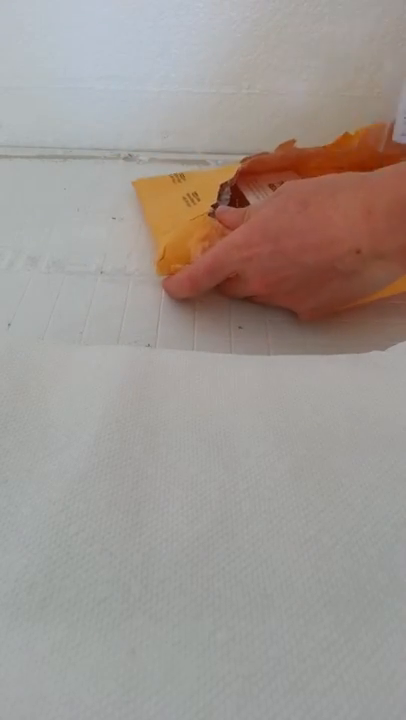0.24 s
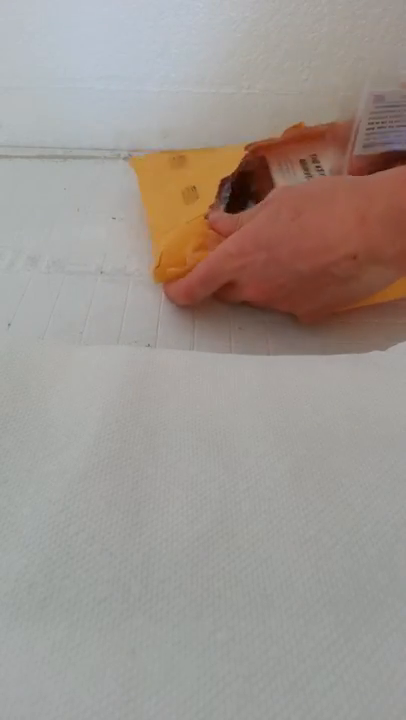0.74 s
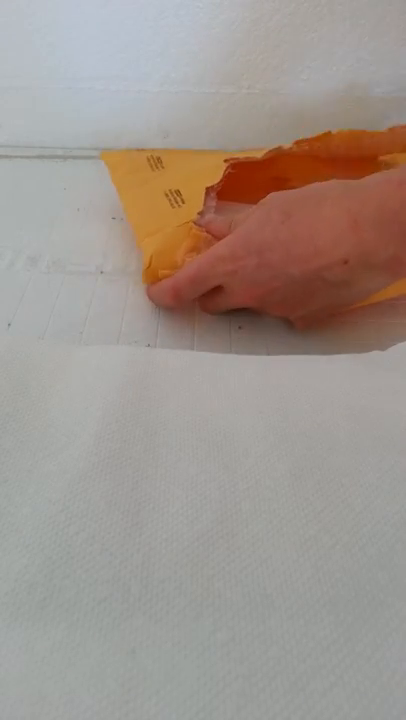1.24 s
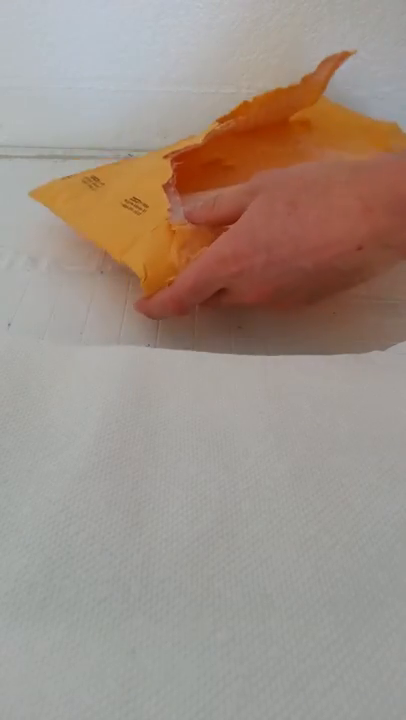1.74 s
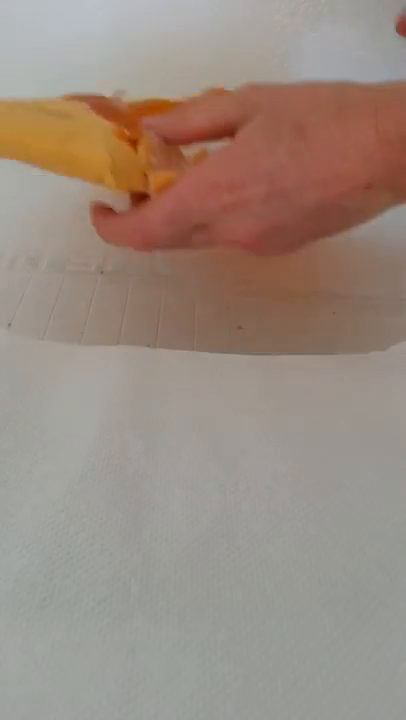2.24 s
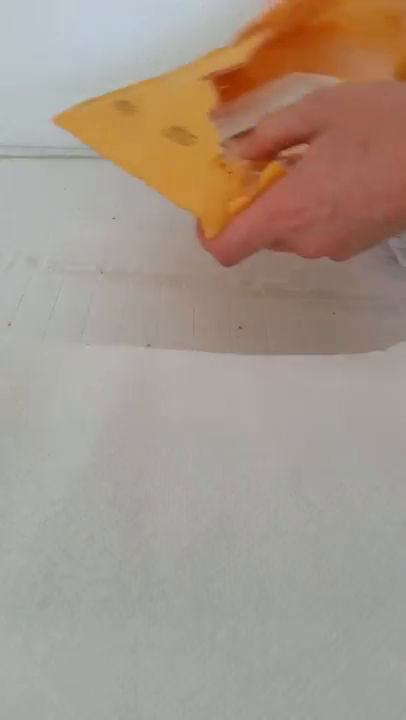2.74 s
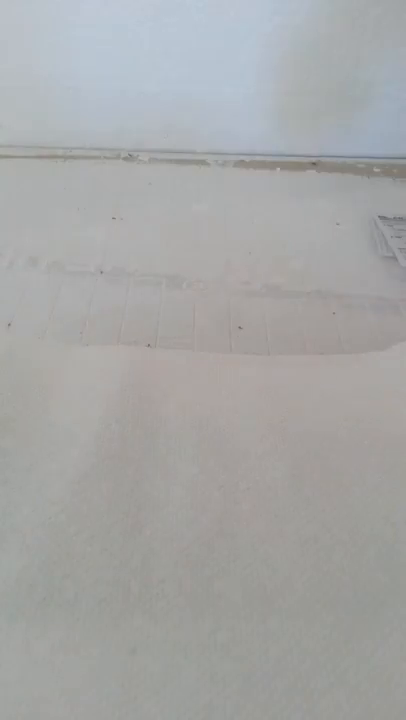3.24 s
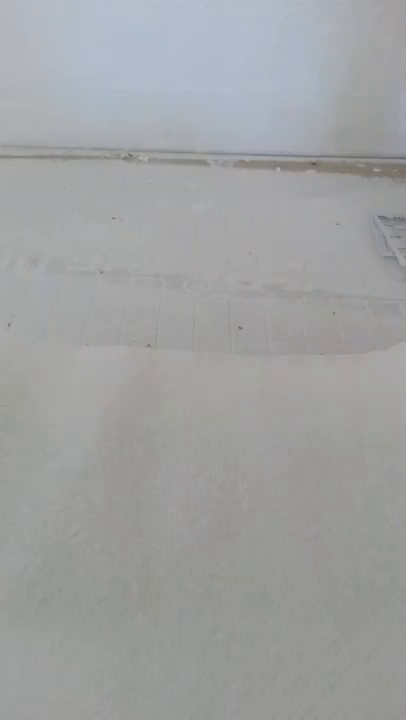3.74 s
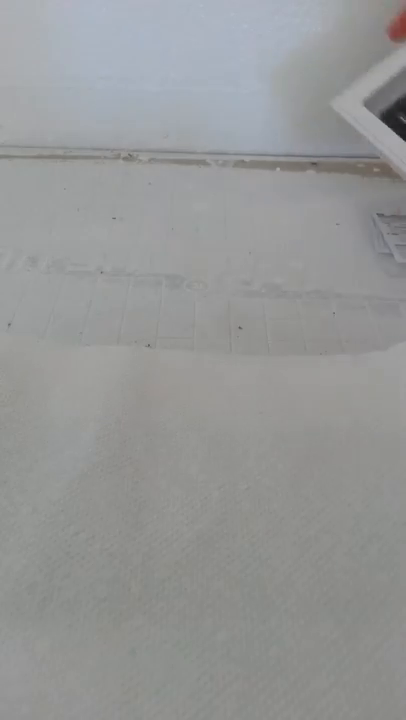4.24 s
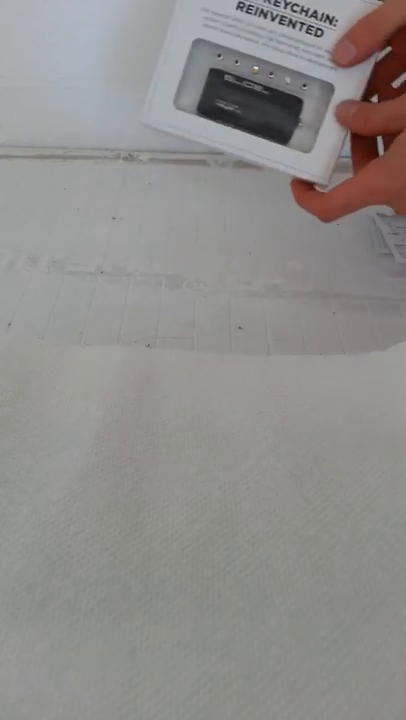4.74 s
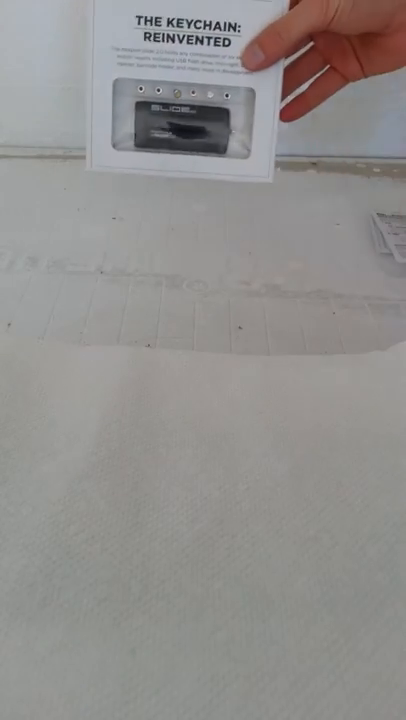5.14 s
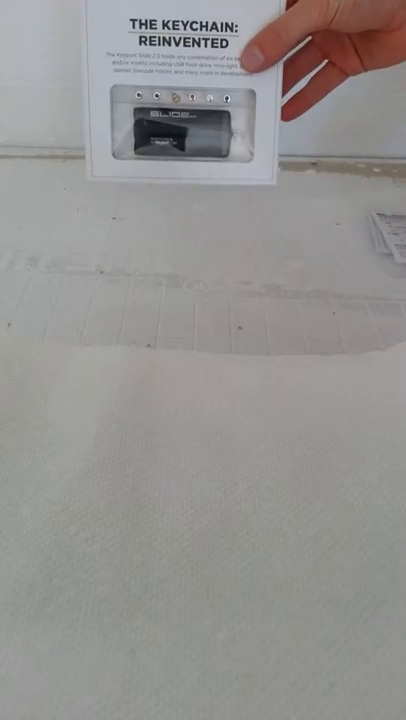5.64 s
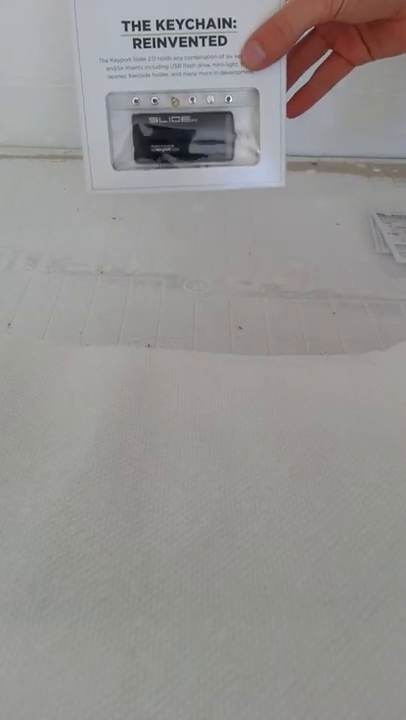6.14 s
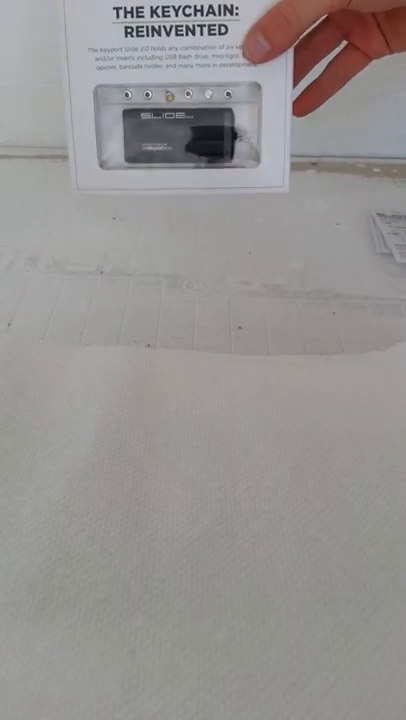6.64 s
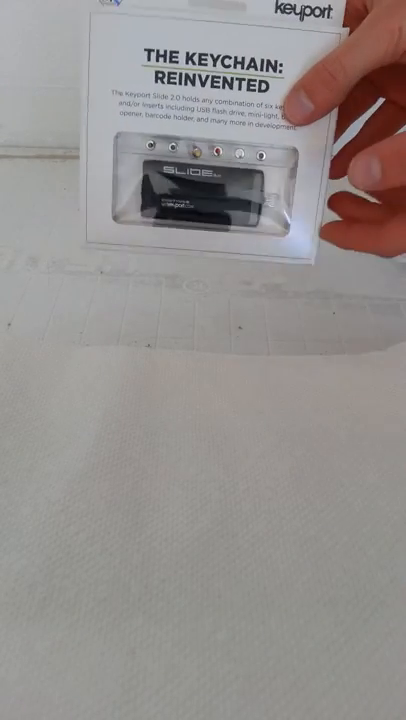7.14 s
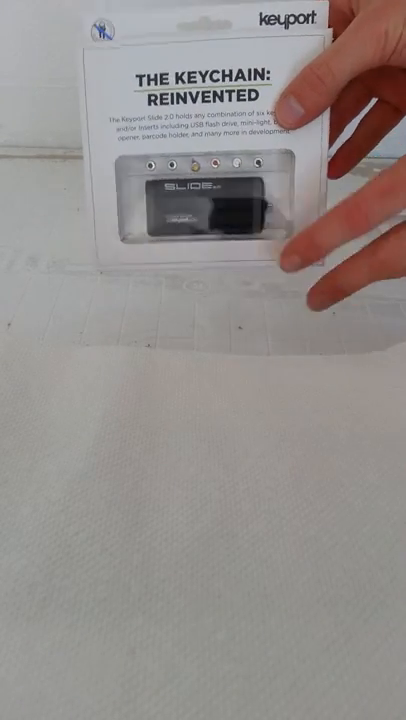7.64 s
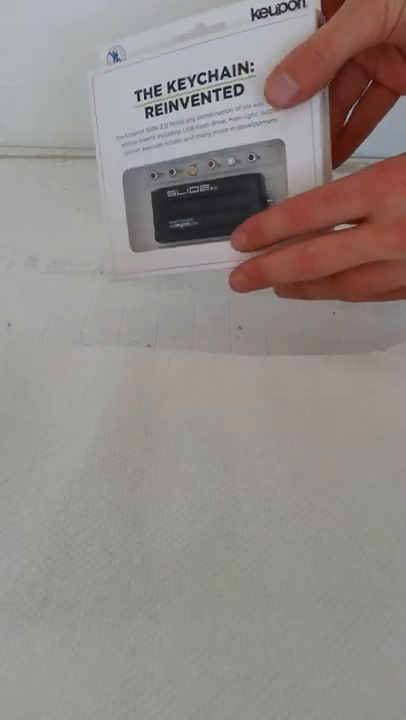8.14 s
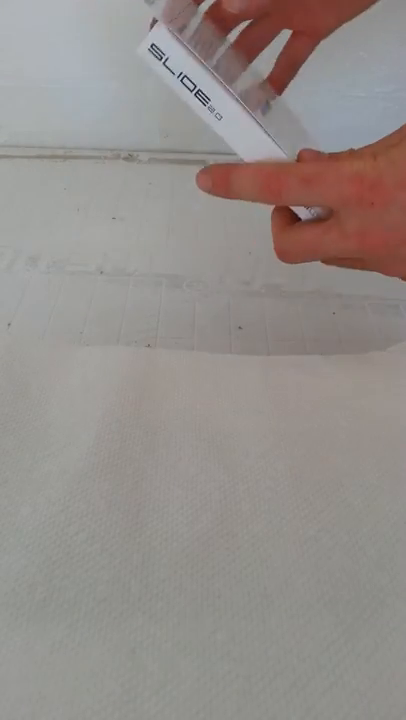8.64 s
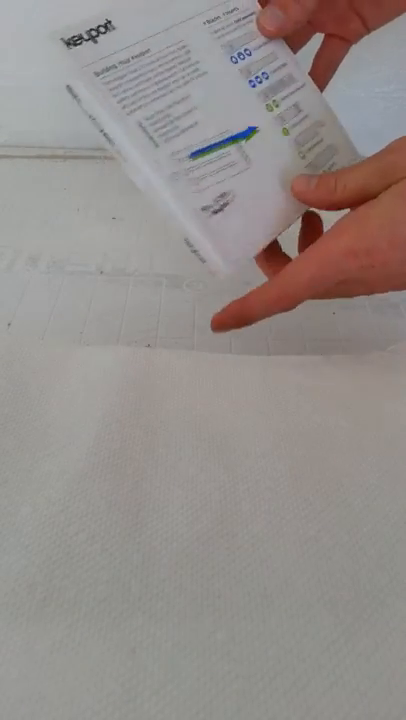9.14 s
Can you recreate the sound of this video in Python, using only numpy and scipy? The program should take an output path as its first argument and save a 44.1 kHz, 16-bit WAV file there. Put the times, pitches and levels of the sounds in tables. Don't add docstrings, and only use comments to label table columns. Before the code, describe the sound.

Hands empty a torn padded paper envelope close to the microphone in a bare, echoing room. Dense crisp rustling, crease snaps and dull knocks build to the loudest crumple around two and a half seconds. The envelope is tossed and thuds on the floor, the rustle dies away, and only a soft hush remains with faint finger slides and small taps on a thin card box.

```python
import sys
import numpy as np
from scipy import signal
from scipy.fft import rfft, irfft, next_fast_len
from scipy.io import wavfile
from scipy.ndimage import uniform_filter1d, map_coordinates

SR = 44100
rng = np.random.default_rng(int(sys.argv[2]) if len(sys.argv) > 2 else 0)


def output_pcm(signal):
    pcm = np.clip(np.atleast_2d(signal).T, -1, 1) * 32767
    wavfile.write(sys.argv[1], SR, np.round(pcm).astype(np.int16))


def rack_gain(trim_db):
    fader = np.asarray(trim_db, float)
    return 10 ** (fader / 20)


N = 414091
SIZE = next_fast_len(N + SR)
SHORT = 2 ** 15
BURST = 8000

# frequency in Hz, level in dB per Hz.
CRISP = [(1760, -43.5), (2600, -17.5), (3300, -11.5), (4200, -6), (4990, -3), (6210, -1.5), (6840, 0),
         (9070, -10.5), (14000, -18), (14550, -17.5), (15200, -46.5)]
# frequency in Hz, level in dB per Hz.
MIDDLE = [(590, -30.5), (1000, -3), (1520, -1.5), (1810, 0), (3300, -5), (4000, -9.5), (5200, -22),
          (8800, -120)]
# frequency in Hz, level in dB per Hz.
BODY = [(29, -43.5), (50, -29), (115, -11.5), (253, -2.5), (361, -3), (531, -2.5), (586, -6), (686, -0.5),
        (938, -6.5), (1500, -19.5), (1950, -46), (3300, -120)]
# time in seconds, level of the top register in dB.
FACING = [(0, -1.5), (.8, 3.5), (1.3, 0.5), (1.8, -3.5), (2.52, 0.5), (2.62, -8), (2.73, -13.5), (2.8, 0.5),
          (2.97, 5), (3.02, 1), (3.2, 1), (3.28, -3), (3.55, 3), (3.72, -1.5), (3.8, -6), (3.95, -1.5),
          (4.6, 1), (9.39, -1.5)]


def paper():
    crisp, middle, body = rustle()
    crisp_snaps, middle_snaps = snaps()
    crisp = crisp + crisp_snaps
    beam_hz = 11000
    top = signal.sosfilt(signal.butter(4, beam_hz, "high", fs=SR, output="sos"), crisp)
    rest = signal.sosfilt(signal.butter(4, beam_hz, "low", fs=SR, output="sos"), crisp)
    bright = colour(rest + top * rack_gain(in_time(FACING)[0]), CRISP)
    return bright + colour(middle + middle_snaps, MIDDLE) + colour(body, BODY)


# time in seconds, room sound in dB against direct sound, grains per second.
DISTANCE = [(0, -7.5, 3060), (3.2, -9, 2300), (3.45, -5.5, 2300), (4.2, -5, 2830), (4.6, -10.5, 3000),
            (5.2, -11, 3900), (9.39, -23.5, 4430)]


def rustle():
    shake = grains(in_time(DISTANCE)[1], spread_db=4.0, clump_db=3.0) + 0.8 * rng.standard_normal(N)
    shake = shake * rack_gain(-3)
    turned = np.abs(shake) * np.sign(shake[::-1])
    crisp = shake * effort(shift_db=0, follows=0, lingers=0.8)
    middle = turned * effort(shift_db=-4, follows=0.57, lingers=0.92)
    body = shake * effort(shift_db=0, follows=0.92, lingers=0.94)
    return crisp, middle, body


# peak time in seconds, crisp rustle in dB,
# rise in seconds, fade in seconds, weight (body in dB against crisp).
GRIPS = [(0.0, -34.5, .5, 2.2, -9), (.34, -34.5, 0.036, 2.5, -12.5), (.53, -35.5, 0.55, 0.96, -15.5),
         (.86, -26, 0.33, 1.2, -12), (1.12, -30, 0.24, 0.41, -11), (1.56, -26, 0.0055, 0.63, 0.5),
         (2.037, -38, 0.0066, 0.64, -17.5), (2.2, -35, 0.007, 0.59, -18.5), (2.34, -46, .08, 0.88, -18.5),
         (2.58, -17.5, 0.068, 0.4, -15), (2.8, -27.5, 0.033, 1.1, -13.5), (2.9, -20.5, 0.19, 0.55, -9.5),
         (3.09, -23.5, 0.34, 0.4, -8.5), (3.49, -27.5, .005, 0.57, -8), (3.704, -25, .03, 0.51, -0.5),
         (3.94, -40.5, 0.034, 0.89, 4), (4.357, -35.5, 0.067, 0.043, -8), (4.39, -54.5, .1, 0.62, -8.5),
         (4.561, -41, 0.054, 0.3, 5.5), (4.8, -47.5, 0.048, 0.23, 4.5), (4.91, -59, 0.043, 0.15, 21)]
# peak time in seconds, crisp rustle in dB,
# rise in seconds, fade in seconds, weight (body in dB against crisp).
TURNS = [(5.4, -73.5, .6, .8, 2.5), (6.03, -53.5, 0.15, 0.29, -6.5), (6.31, -63, 0.18, 0.77, -0.5),
         (6.561, -68.5, .3, 0.16, 0.5), (6.88, -54.5, 0.16, 0.13, -20.5), (7.05, -75, 0.051, 0.19, 0),
         (7.11, -37.5, 0.018, 0.087, -13.5), (7.16, -62, 0.056, 0.22, 0), (7.27, -66, 0.047, 0.099, -7),
         (7.678, -58.5, 0.095, 0.71, -18), (7.762, -52, 0.093, 0.28, -4), (8.236, -49.5, 0.015, 0.27, -1.5),
         (8.465, -54.5, .016, 0.13, -4), (8.724, -40.5, .01, 0.23, -8), (8.998, -46, 0.016, 0.087, -11.5),
         (9.2, -74, 0.55, 1.1, 1)]


def effort(shift_db, follows, lingers):
    t, power = np.arange(0, N + 64, 64) / SR, 1e-14
    for s, db, rise, fade, weight_db in GRIPS + TURNS:
        level_db = db + shift_db + follows * weight_db + swell_db(t, s, rise, fade * lingers)
        power = power + rack_gain(level_db) ** 2
    return np.interp(np.arange(N) / SR, t, np.sqrt(power))


# time in seconds, peak in dB, middle in dB against the peak.
TICKS = [(.1149, -4.5, -17), (.216, -15.5, -32), (.402, -12.5, -20.5), (.6258, -16, -23),
         (.6894, -20.5, -27.5), (.8153, -14.5, -28), (1.046, -14.5, -16.5), (1.3193, -14, -24.5),
         (1.3472, -22, -27), (1.9129, -26.5, -5.5), (2.0596, -14.5, -16.5), (2.284, -26, -24),
         (2.3262, -14.5, -38.5), (2.3454, -23.5, -20.5), (2.4186, -30, -30), (2.557, 0, -16.5),
         (2.9481, -2, -27), (3.0003, -3.5, -14.5), (3.0879, -6, -15), (3.1443, -16, -24.5),
         (3.6784, -3.5, -1.5), (4.105, -19, -8), (4.2572, -24.5, -30), (4.358, -11, -14.5),
         (4.7196, -23, -21), (4.7693, -34.5, -6.5), (4.796, -26, -14), (5.115, -30.5, -18)]
# time in seconds, peak in dB, middle in dB against the peak.
SNAPS = [(0.7098, -15.5, -18), (1.121, -17, -33), (1.152, -12, -44), (1.2282, -12.5, -18.5),
         (1.45, -36, -7.5), (1.556, -7, -6), (1.6, -7.5, -10), (1.843, -22.5, -23.5), (1.943, -25.5, -11.5),
         (2.034, -17.5, -15.5), (2.196, -21.5, -41), (2.432, -23, -27.5), (2.818, -13, -13.5),
         (2.8781, -9, -9.5), (2.971, -11, -10), (3.0636, -10, -14), (3.1125, -7, -26.5), (3.4848, -11, -17),
         (3.6592, -10.5, -11), (3.936, -15, -12.5), (4.0742, -20.5, -8), (4.1994, -20.5, -11.5),
         (4.5338, -25, -13), (4.564, -23, -7.5), (4.8142, -24.5, -17.5), (4.905, -29, -10.5)]
# time in seconds, peak in dB, middle in dB against the peak.
FLICKS = [(5.4471, -45, -19), (6.3159, -37, -21), (7.1097, -36, -11), (7.767, -32, -7.5),
          (8.234, -29, -7.5), (8.2935, -27.5, -13), (8.4662, -28.5, -14), (8.717, -29.5, -19),
          (8.734, -30.5, -31.5), (8.781, -30, -2.5), (8.8128, -26.5, -18), (8.9085, -38.5, -20),
          (8.993, -34.5, -23), (9.203, -40.5, -18.5)]
# time in seconds, peak in dB, sometimes middle in dB against it.
SLIDES = [(.5197, -19.5), (5.9612, -49.5), (6.0227, -51, -21), (6.089, -54, -17), (6.5594, -54.5),
          (6.8326, -56, -18.5), (6.92, -56.5), (7.1777, -48), (7.2564, -56), (7.642, -49.5),
          (7.9914, -50.5, -15), (9.1488, -57.5)]
# time in seconds, peak in dB.
LEAD_INS = [(2.54, -18.5), (4.343, -35), (5.104, -54.5), (6.297, -55), (7.088, -55), (8.218, -54),
            (8.457, -45.5), (8.983, -54)]
# time in seconds, peak in dB.
CRACKS = [(2.5603, 1), (2.566, -11), (2.787, -13.5), (2.9134, -9.5), (3.4899, -18)]
# share of sudden crack from 0 to 1, seconds to die by 60 dB,
# left against right in dB, usual middle in dB against the peak.
KINDS = [
    (0.82, 0.018, -2, -20),
    (0.67, 0.084, -3.5, -15),
    (0.79, 0.078, -1.5, -15),
    (0.19, 0.13, -1.5, -24.5),
    (.08, 0.047, -1, -14),
    (0.67, 0.017, -0.5, -18.5),
]
# time in seconds, peak in dB.
POPS = [(.2678, -21.5), (.6262, -6.5), (.7114, -14), (.7186, -17), (.7797, -16.5), (.8168, -11),
        (.8528, -9.5), (.916, -11.5), (1.2377, -14.5), (1.3257, -24.5), (1.601, -7.5), (1.9969, -28.5),
        (2.039, -22.5), (2.2014, -17.5), (2.2091, -22.5), (2.3225, -20.5), (2.3517, -21), (2.4395, -23),
        (2.8006, -13), (2.892, -5), (3.023, -9), (3.036, -9), (3.2019, -17), (3.9367, -13), (4.0737, -16),
        (4.546, -21), (4.5649, -11), (4.8162, -24)]


def snaps():
    crisp, middle = np.zeros((2, 2, N + BURST))
    t = np.arange(BURST) / SR
    tables = [TICKS, SNAPS, FLICKS, SLIDES, LEAD_INS, CRACKS]
    for table, (crack, t60, pan_db, usual_db) in zip(tables, KINDS):
        flurry = (1 - np.exp(-t / (0.07 * t60))) * rack_gain(-60 * t / t60)
        shape = (1 - crack) * flurry / flurry.max() + 1.3 * crack * rack_gain(-60 * t / 0.0057)
        step = 2.0 * crack * (t == 0)
        pan = rack_gain([[1.5 * pan_db], [-0.4 * (pan_db + 1.5)]])
        for row in table:
            s, db, middle_db = (*row, usual_db)[:3]
            noise = rng.standard_normal(BURST)
            force = shape * np.array([noise, noise[::-1]]) + step
            burst = rack_gain(db - 6.5) * force[:, None] * pan
            i = round(s * SR)
            crisp[:, i:i + BURST] += burst[0]
            middle[:, i:i + BURST] += burst[1] * rack_gain(middle_db + 10.0)
    for s, db in POPS:
        crisp[:, round(s * SR)] += rack_gain(db + np.array([-3.0, 3.0]))
        middle[:, round(s * SR)] += rack_gain(db - 13.5)
    return crisp[:, :N], middle[:, :N]


# time in seconds, peak in dB, pitch in Hz.
THUMPS = [(0.115, -31, 656), (.396, -36.5, 542.4), (.648, -31.5, 670), (.678, -29.5, 660),
          (.732, -20.5, 553), (.779, -29, 1440), (1.048, -28, 738), (1.146, -26, 460), (1.23, -25.5, 670),
          (1.455, -31.5, 950), (1.558, -11, 677), (1.5995, -16.5, 791), (1.65, -21, 744),
          (2.555, -27.5, 240), (2.853, -29, 258), (2.911, -20, 600), (3.041, -29, 328), (3.069, -20.5, 403),
          (3.491, -28, 413), (3.544, -26.5, 350), (3.662, -14, 579.3), (3.678, -3, 463.6),
          (4.357, -45, 760), (4.536, -36, 783), (4.566, -32, 740), (4.795, -31, 734), (4.914, -33, 774)]
# time in seconds, peak in dB, pitch in Hz.
TAPS = [(5.685, -58, 398), (5.789, -55.5, 413.6), (6.406, -54, 383), (7.1, -46.5, 288), (7.766, -28, 1235),
        (7.994, -49, 349), (8.234, -33, 1236), (8.315, -35.5, 1260), (8.739, -42, 307), (8.781, -29, 640),
        (5.117, -50, 503), (7.74, -54, 487), (7.946, -58.5, 1052), (7.996, -50, 1175), (8.219, -47, 370),
        (8.316, -41, 686), (8.756, -41, 1250), (8.994, -62, 291), (7.016, -63, 1304), (7.04, -58, 1098),
        (7.063, -61, 1400), (6.0, -49, 500), (3.6954, -23, 475), (3.702, -15, 397), (1.605, -18, 660),
        (1.612, -16, 744)]


def thumps():
    out, t = np.zeros(N + BURST), np.arange(BURST) / SR
    for table, t60 in [(THUMPS, 0.016), (TAPS, 0.009)]:
        for s, db, hz in table:
            ratios = [0.5, 1, 1.5] * rack_gain(0.39 * rng.standard_normal(3))
            modes = rack_gain([-12, 0, -10]) @ np.sin(2 * np.pi * hz * np.outer(ratios, t))
            swell = (1 - np.exp(-t * hz * 4)) * rack_gain(-60 * t / t60)
            i = round(s * SR)
            out[i:i + BURST] -= rack_gain(db + 4.5) * modes * swell / swell.max()
    return signal.sosfilt(signal.butter(3, 150, "high", fs=SR, output="sos"), out[:N])


# peak time in seconds,
# level in dB, rise in seconds, fade in seconds, pitch in Hz.
POCKETS = [(0.748, -42.5, 0.033, .5, 526), (1.458, -53, .006, 0.034, 950), (1.564, -26, .008, 0.24, 880),
           (2.09, -44, 0.092, 0.41, 1850), (2.382, -46, .03, 0.033, 2920), (2.445, -51, 0.044, 0.082, 3050),
           (3.74, -26, 0.042, 0.18, 1900), (8.24, -49, .008, 0.048, 1500), (1.0, -50, .1, 0.089, 66),
           (1.248, -55, .2, 0.11, 63.8), (4.58, -53, .05, 0.12, 68), (7.79, -61, 0.046, 0.08, 65),
           (8.25, -63, 0.036, .15, 68.3), (8.761, -68, 0.041, 0.18, 68), (2.58, -27, 0.017, 0.33, 3480),
           (2.881, -24.5, .01, .06, 2800), (2.916, -27, .005, .04, 1500), (2.557, -33.5, 0.054, 0.12, 577),
           (3.715, -19, 0.051, 0.6, 420), (3.702, -22.5, 0.02, 0.28, 245), (4.38, -44, 0.11, 0.11, 258),
           (5.46, -70.5, .8, 0.82, 400), (5.9, -67.5, 0.61, .5, 390), (6.4, -71, 0.45, 0.56, 401),
           (7.38, -75, .6, .5, 399.7), (7.769, -48, .03, 0.07, 948), (8.32, -52, .04, 0.07, 504),
           (8.745, -48.5, .02, 0.23, 334), (8.76, -43, 0.03, 0.15, 1010), (9.37, -76, 0.45, .4, 400)]


def pockets():
    out, t = np.zeros(N), np.arange(N) / SR
    sharpness = 1.7
    flutter = 0.74 * grains(400, spread_db=2.5, clump_db=2.0) + 0.7 * rng.standard_normal(N)
    for s, db, rise, fade, hz in POCKETS:
        near = slice(max(0, int((s - 2 * rise) * SR)), int((s + 2 * fade) * SR))
        b, a = signal.iirpeak(hz, sharpness * (hz / 450) ** 0.4, fs=SR)
        force = flutter[near] * rack_gain(db + swell_db(t[near], s, rise, fade))
        force = force * np.sqrt(sharpness * SR / hz)
        out[near] += signal.lfilter(b, a, signal.lfilter(b, a, force))
    return out


def swell_db(t, s, rise, fade):
    return -30 * np.maximum((s - t) / rise, (t - s) / fade)


def grains(per_s, spread_db, clump_db):
    slow = uniform_filter1d(rng.standard_normal(N), size=256) * 16
    born = rng.random(N) < per_s * rack_gain(clump_db * slow) / SR
    sizes = rack_gain(spread_db * np.minimum(rng.exponential(1, N), 4))
    x = born * sizes * rng.choice([-1, 1], N)
    return x / np.sqrt(np.mean(x ** 2))


def tabletop(x):
    hop, left_lag_s = 1024, 0.00027
    sway = uniform_filter1d(uniform_filter1d(rng.standard_normal(N), size=6000), size=6000) * 95
    late = map_coordinates(x[0], [np.arange(N) - SR * left_lag_s * (1 + 0.35 * sway)], order=3)
    out = np.stack([0.42 * late, x[1]])
    starts, t = np.arange(0, N - 4 * hop, hop), np.arange(hop) / SR
    window = np.sin(np.pi * np.arange(2 * hop) / (2 * hop))
    pieces = x[:, starts[:, None] + np.arange(2 * hop)] * window
    paths = rng.standard_normal((2, len(starts), hop)) * rack_gain(-60 * t / 0.025)
    paths *= rack_gain([[[-19]], [[-28]]])
    paths -= uniform_filter1d(paths, size=40)
    scattered = irfft(rfft(pieces, 4 * hop) * rfft(paths, 4 * hop), 4 * hop)
    for k, i in enumerate(starts):
        out[:, i:i + 4 * hop] += scattered[:, k]
    return out


def room(x):
    turn = 2 * np.pi * 1.3 * np.arange(N) / SR
    return through(x * np.cos(turn), walls()) + through(x * np.sin(turn), walls())


# frequency in Hz, seconds to die by 60 dB.
ROOM_T60 = [(150, 0.11), (500, 0.48), (1800, 0.95), (6000, 0.59), (14000, 0.24)]


def walls():
    t, noise, tail = np.arange(SR) / SR, diffuse_noise(SR), 0
    for k, (_, t60) in enumerate(ROOM_T60):
        share = at_hz([(hz, j == k) for j, (hz, _) in enumerate(ROOM_T60)], SR)
        tail = tail + irfft(noise * share, SR) * rack_gain(-60 * t / t60)
    tail = tail * np.clip((t - 0.012) / 0.0016, 0, 1)
    return tail / np.sqrt(np.sum(tail ** 2) / 2)


# frequency in Hz, left against right in dB.
PORTS = [(60, -4), (99, -5.5), (160, 6.5), (270, 7.5), (450, 5), (1220, 1), (3330, 3), (5500, 2.5),
         (9080, -4.5), (11600, -3.5), (13000, -13.5), (14300, -26.5)]
# ringing frequency in Hz, width in Hz, height in dB.
PORT_RING = (6850, 1900, 6.2)


def ports(x):
    hz, width, db = PORT_RING
    ring_db = db / (1 + (2 * (np.arange(SHORT // 2 + 1) * SR / SHORT - hz) / width) ** 2)
    lean_db = at_hz(PORTS, SHORT)
    left = causal(0.91 * lean_db - 0.58 * ring_db)
    right = causal(-0.3 * lean_db + 0.73 * ring_db)
    return through(x, [left, right])


# frequency in Hz, level in dB per Hz.
HUSH = [(15, -23.5), (32, -17), (45, -6), (74, 2), (125, -5), (289, -10), (433, -11.5), (945, -19),
        (1270, -14.5), (2300, -23.5), (4620, -21.5), (6920, -20), (8810, -21), (13900, -19.5),
        (15500, -46.5)]


def hush(x):
    level_db = 10 * np.log10(uniform_filter1d(np.mean(x ** 2, axis=0), size=2600) + 1e-12)
    opening_db = np.clip(0.37 * (level_db + 70.0), 0, 15)
    flicker = uniform_filter1d(rng.standard_normal(N), size=2500) * 50
    noise = colour(irfft(diffuse_noise(SIZE), SIZE), HUSH)
    return rack_gain(-70.5 + opening_db + 0.84 * flicker) * noise


# frequency in Hz, likeness from 0 to 1.
LIKENESS = [(40, .55), (120, .92), (250, .85), (500, .45), (900, .02), (16000, .0)]


def diffuse_noise(size):
    mid, side = rfft(rng.standard_normal((2, size)))
    alike = np.clip(at_hz(LIKENESS, size), 0, 1)
    return np.sqrt((1 + alike) / 2) * mid + np.sqrt((1 - alike) / 2) * side * [[1], [-1]]


def in_time(rows):
    s, *columns = np.transpose(rows)
    return [np.interp(np.arange(N) / SR, s, c) for c in columns]


def at_hz(points, size):
    hz, value = np.transpose(points)
    return np.interp(np.log(np.arange(size // 2 + 1) * SR / size + 1), np.log(hz), value)


def causal(db):
    cepstrum = irfft(db * np.log(10) / 20)
    cepstrum[1:SHORT // 2] *= 2
    cepstrum[SHORT // 2 + 1:] = 0
    return irfft(np.exp(rfft(cepstrum)))


def colour(x, spectrum):
    response = causal(np.maximum(at_hz(spectrum, SHORT), -70))
    return through(x, response / np.sqrt(np.sum(response ** 2)))


def through(x, response):
    return irfft(rfft(x, SIZE) * rfft(response, SIZE), SIZE)[..., :N]


def scene():
    sheet = paper()
    blows = thumps() + pockets()
    to_room = sheet.mean(0) + rack_gain(-1.5) * blows
    arriving = tabletop(sheet + blows) + room(to_room * rack_gain(in_time(DISTANCE)[0]))
    heard = ports(arriving)
    return heard + hush(heard)


def roll_off(x):
    return signal.sosfilt(signal.butter(12, 15700, fs=SR, output="sos"), x)


def record(dry):
    clipped = np.clip(dry, -0.9, 0.9)
    cut = signal.sosfilt(signal.cheby2(10, 50, 15350, fs=SR, output="sos"), clipped)
    return roll_off(cut)


dry = scene()
out = record(dry)
output_pcm(out)
```